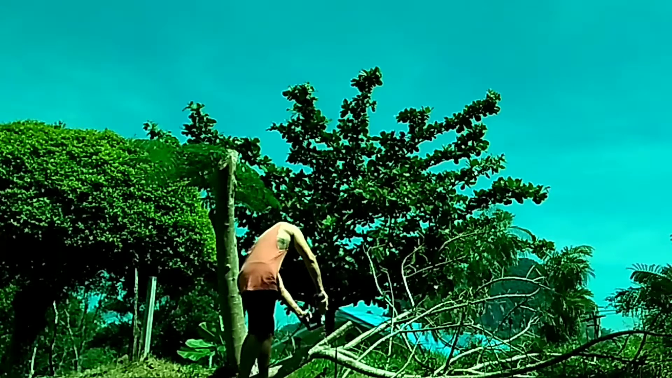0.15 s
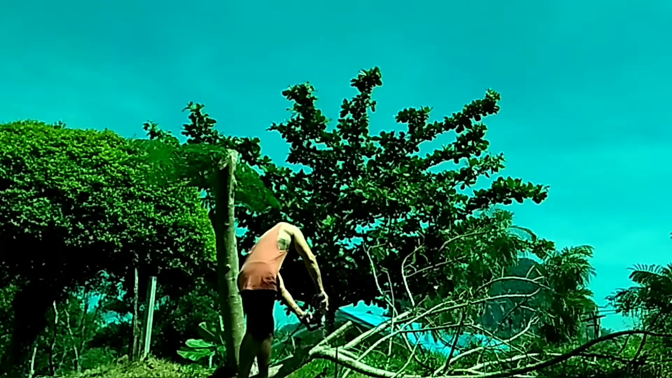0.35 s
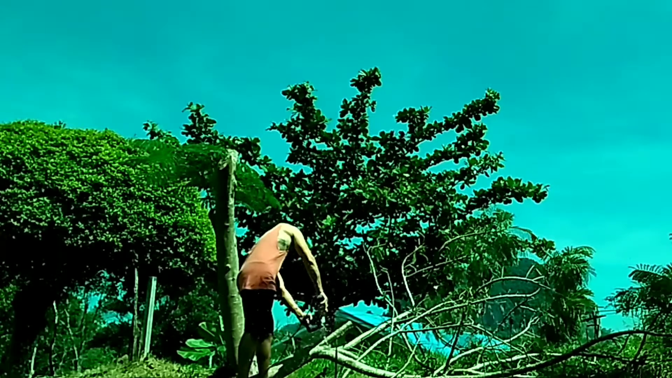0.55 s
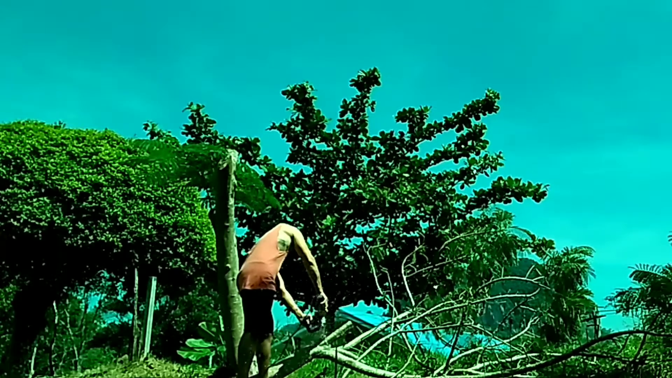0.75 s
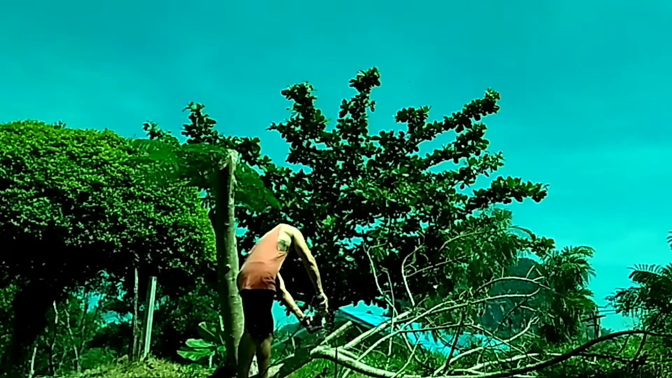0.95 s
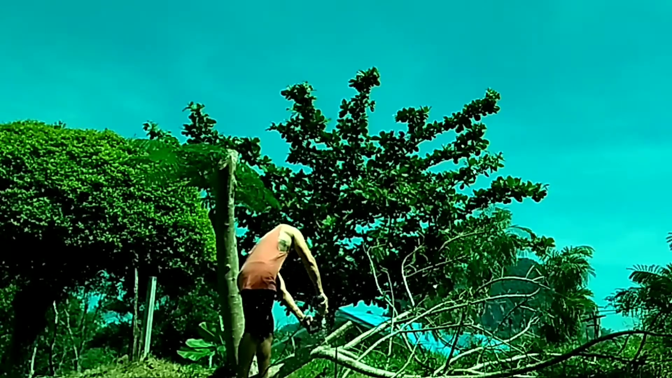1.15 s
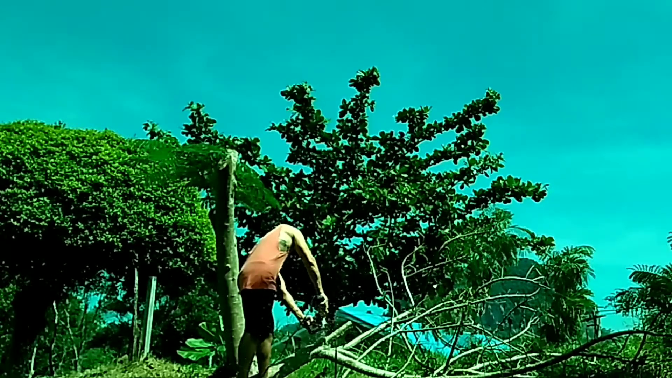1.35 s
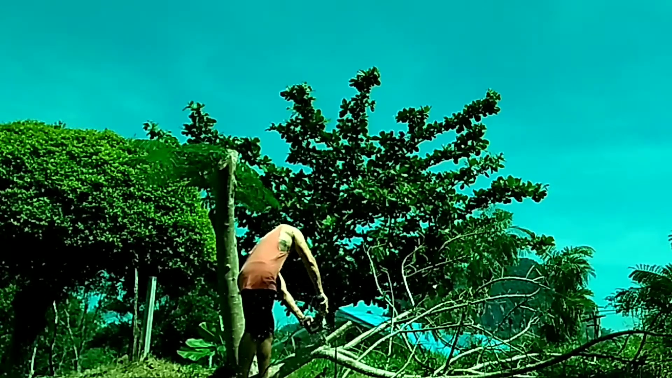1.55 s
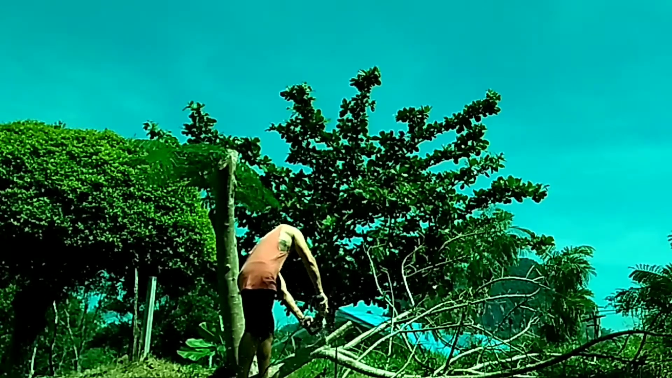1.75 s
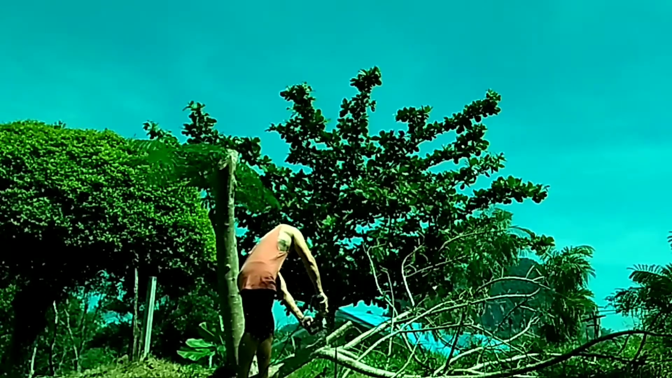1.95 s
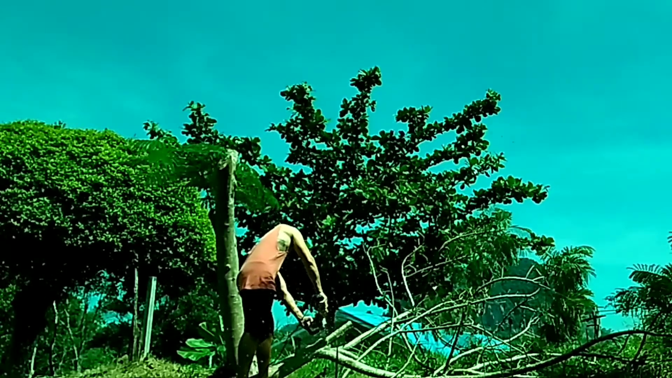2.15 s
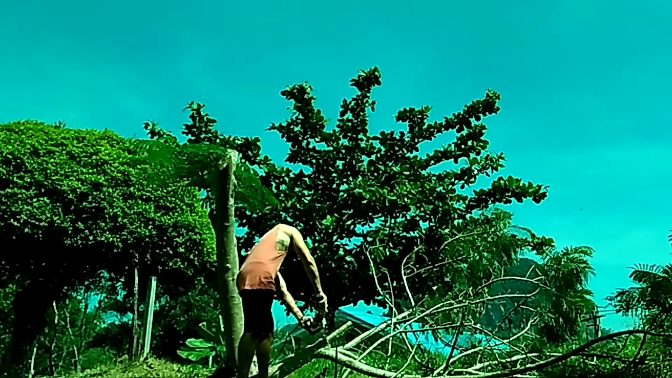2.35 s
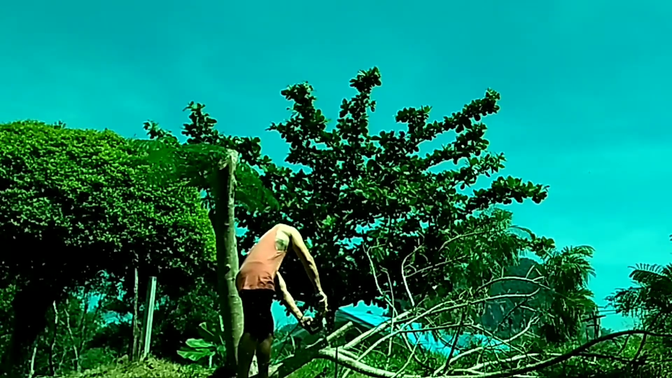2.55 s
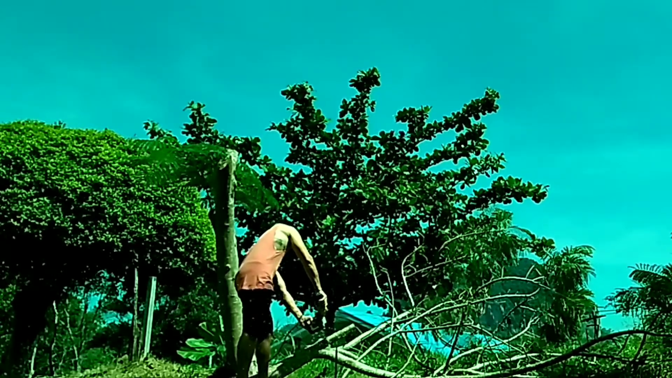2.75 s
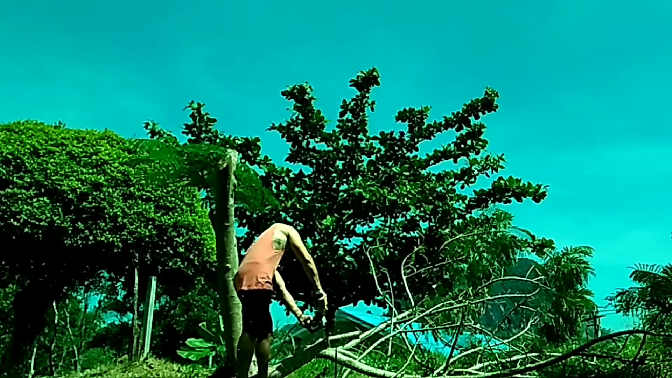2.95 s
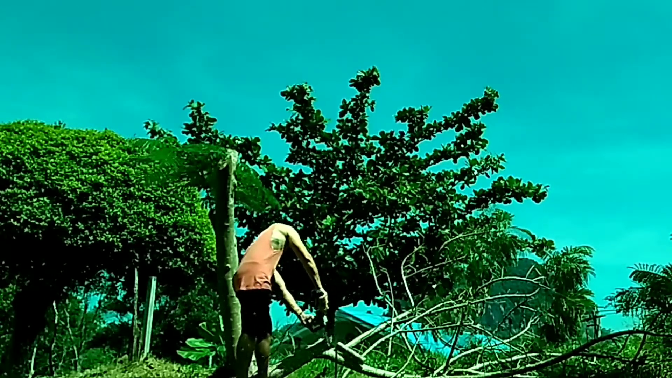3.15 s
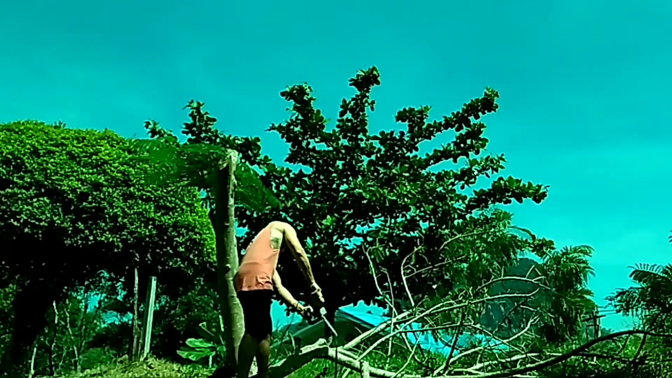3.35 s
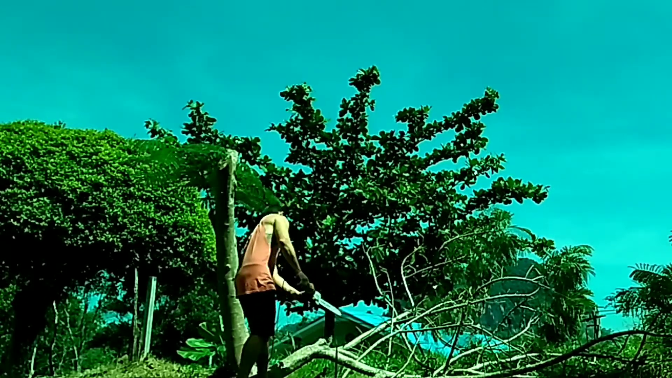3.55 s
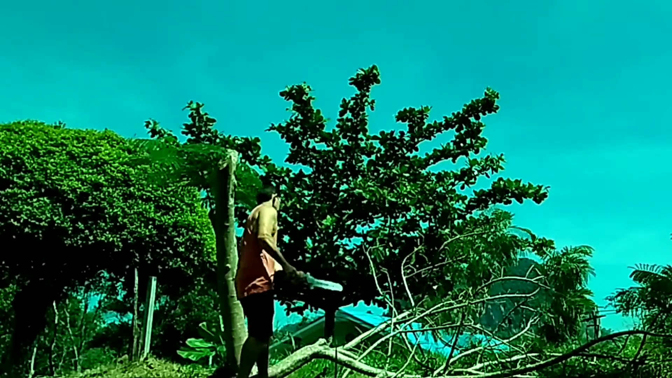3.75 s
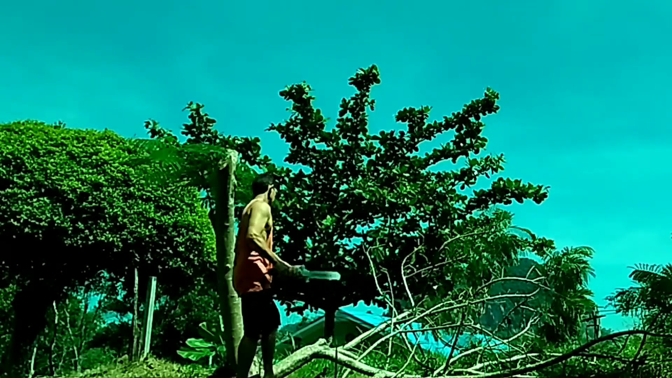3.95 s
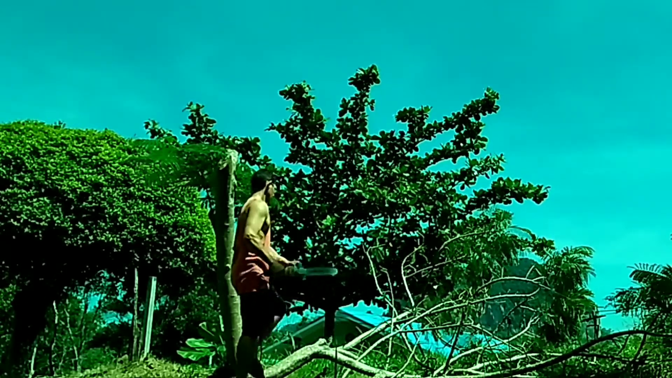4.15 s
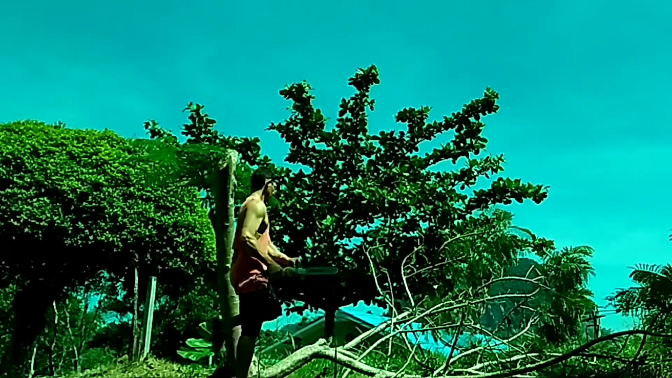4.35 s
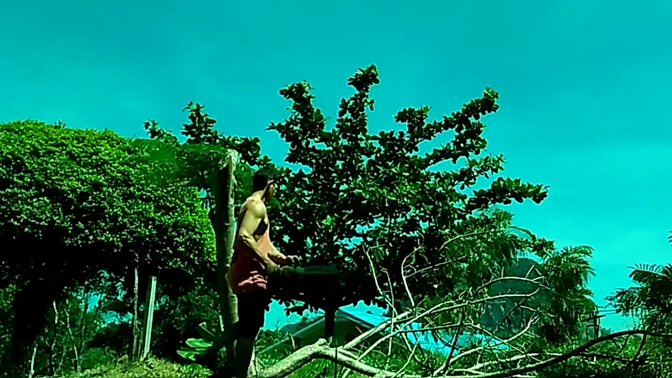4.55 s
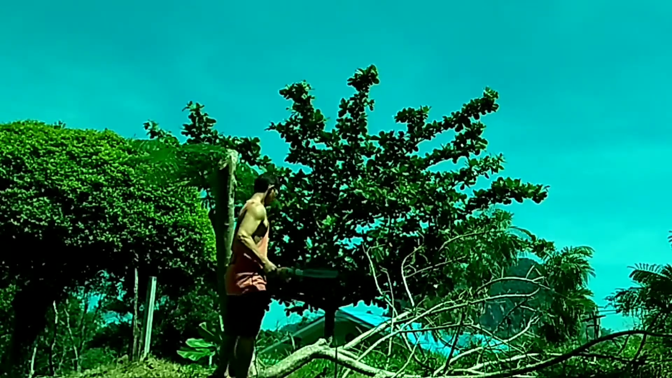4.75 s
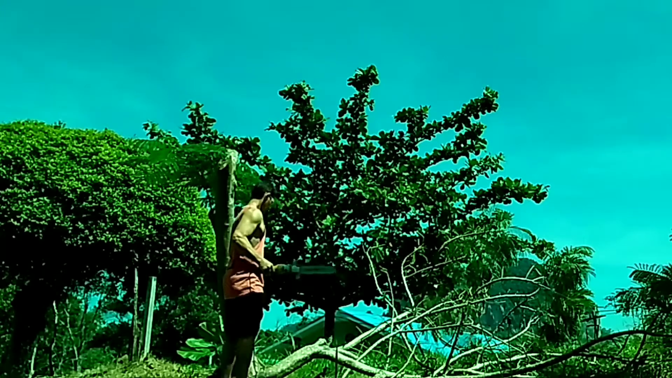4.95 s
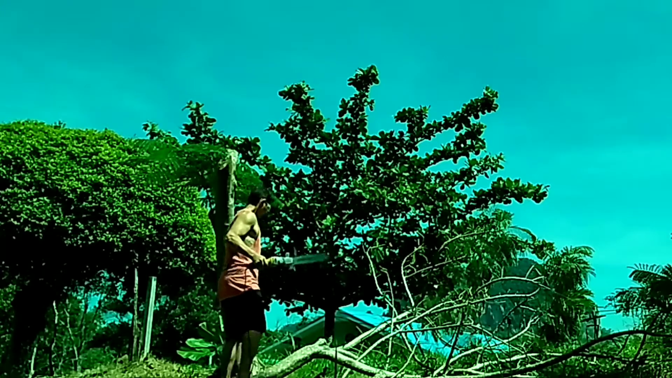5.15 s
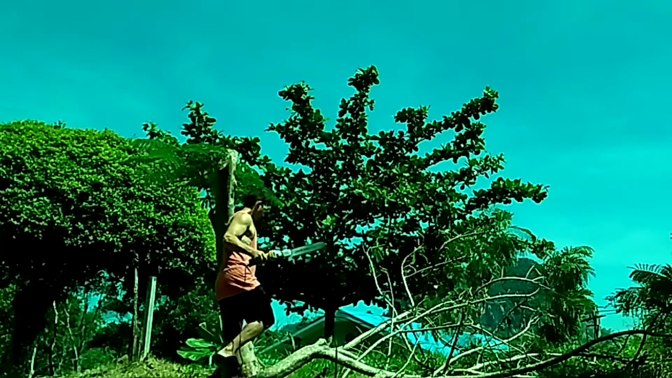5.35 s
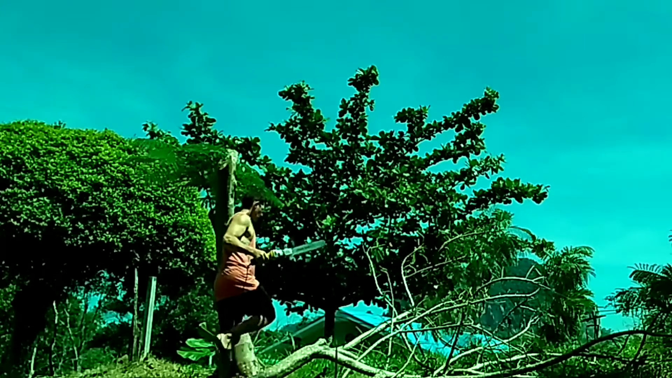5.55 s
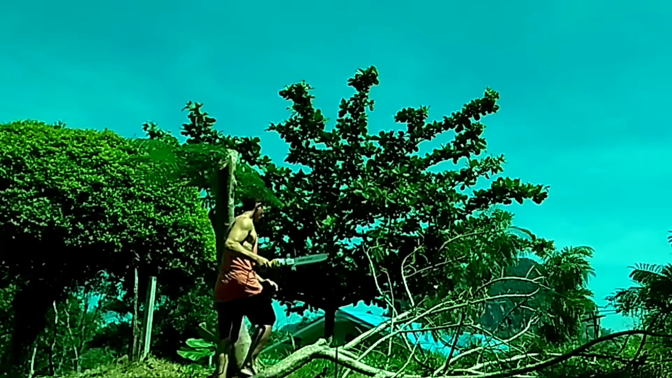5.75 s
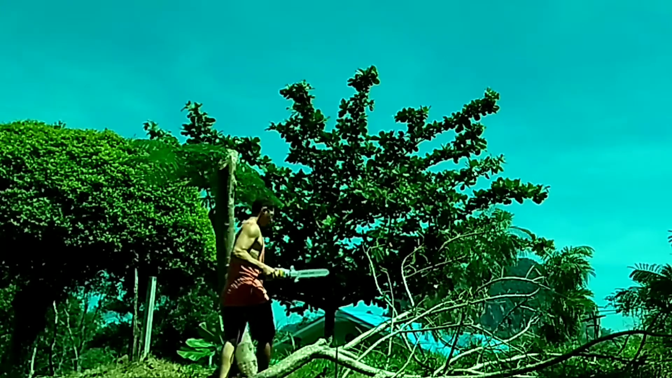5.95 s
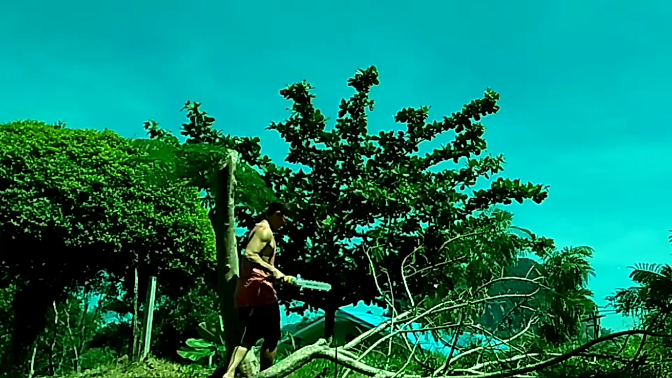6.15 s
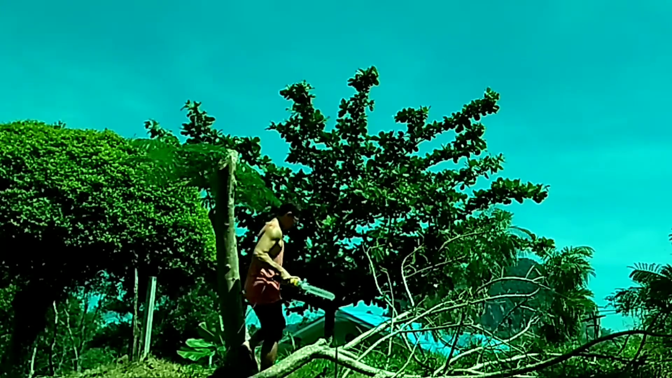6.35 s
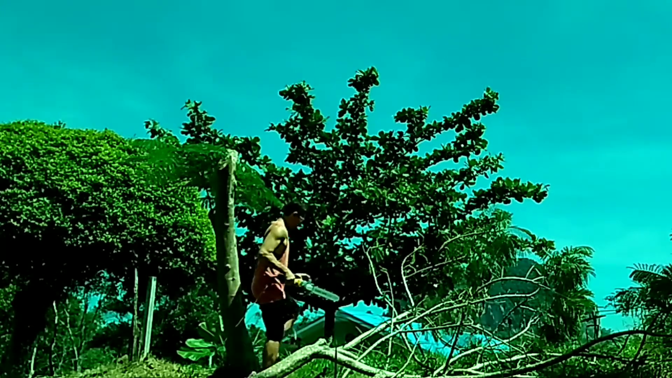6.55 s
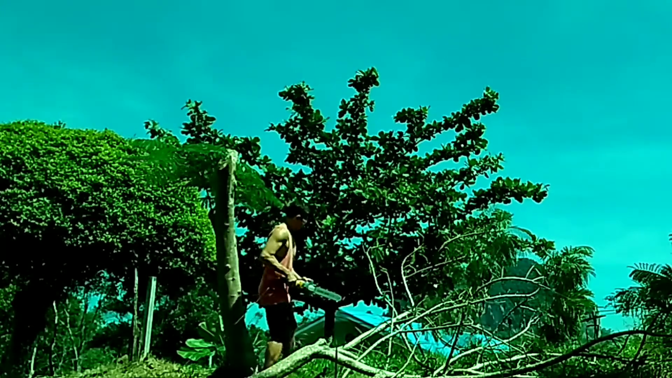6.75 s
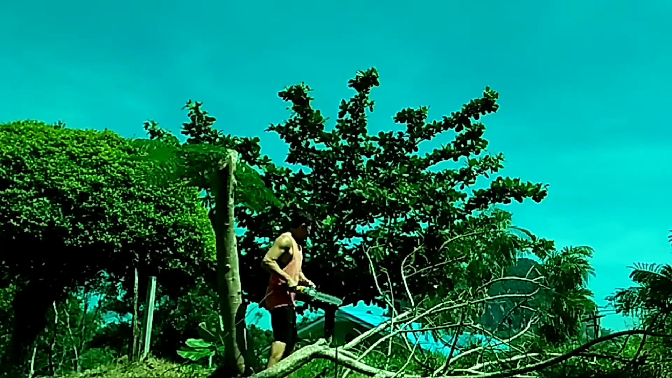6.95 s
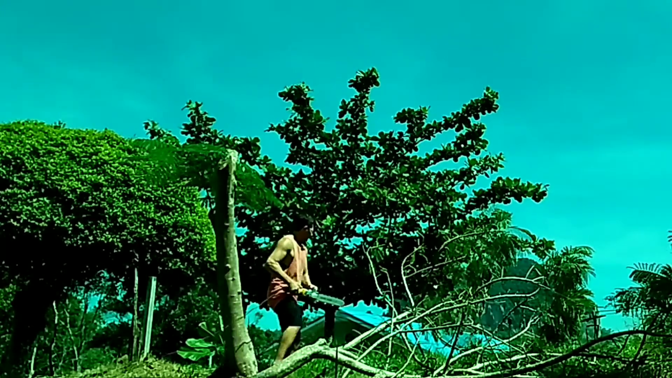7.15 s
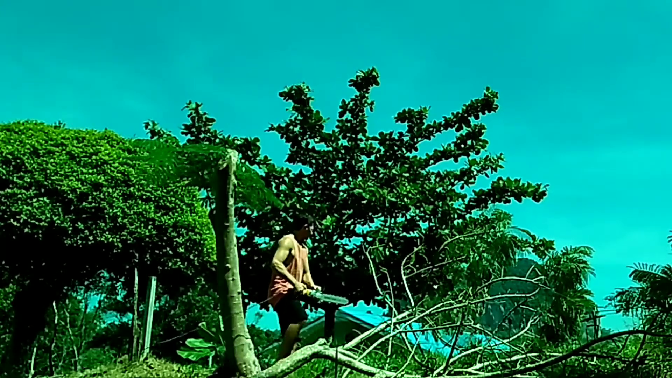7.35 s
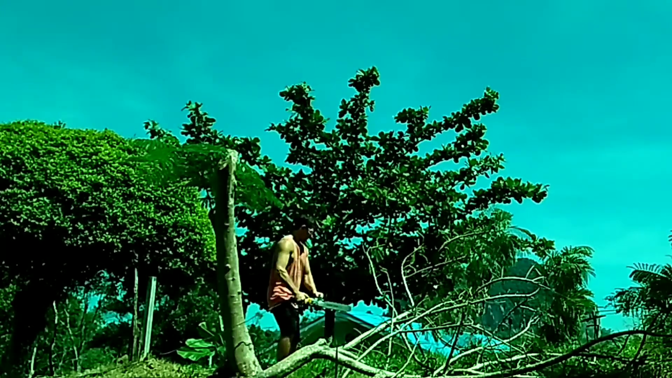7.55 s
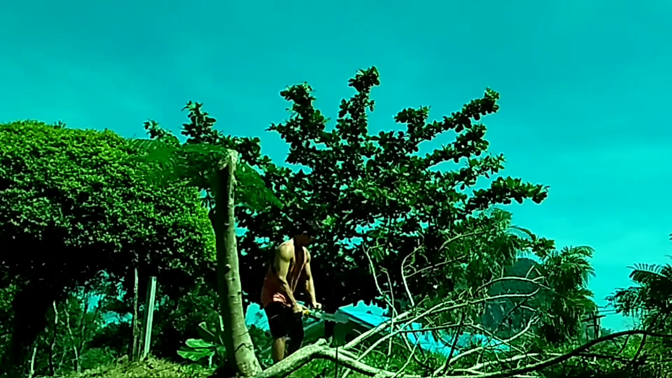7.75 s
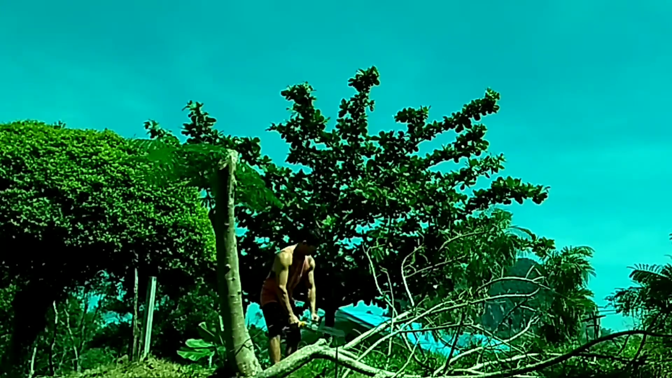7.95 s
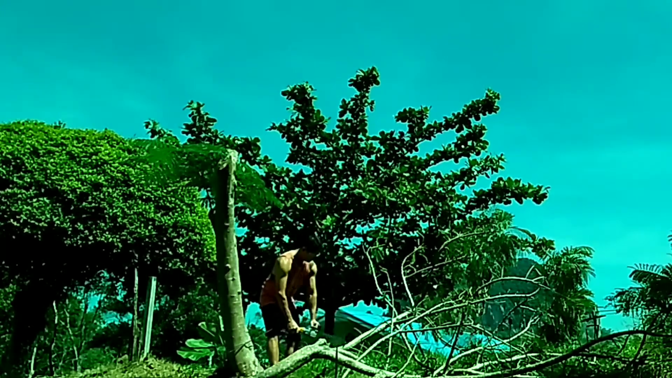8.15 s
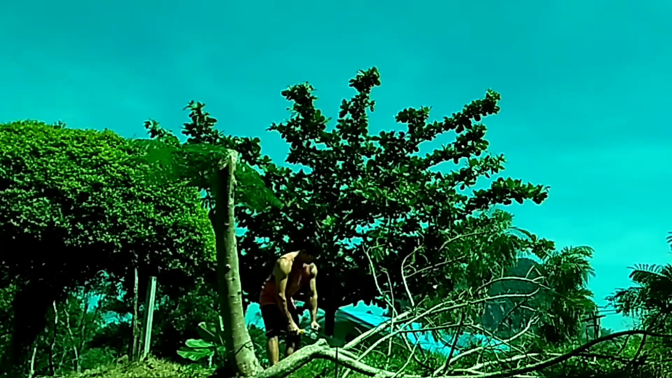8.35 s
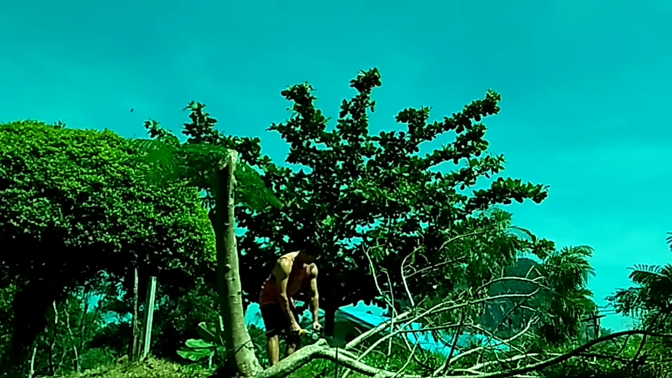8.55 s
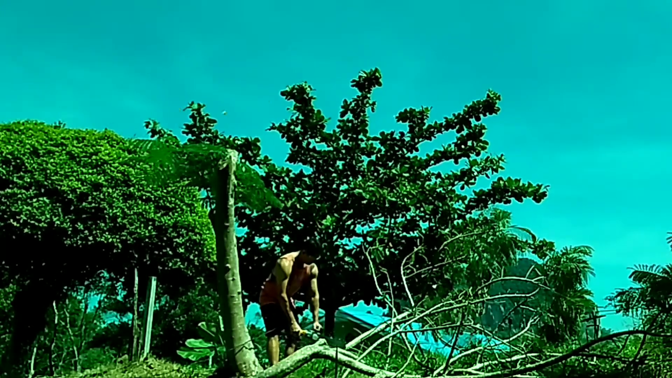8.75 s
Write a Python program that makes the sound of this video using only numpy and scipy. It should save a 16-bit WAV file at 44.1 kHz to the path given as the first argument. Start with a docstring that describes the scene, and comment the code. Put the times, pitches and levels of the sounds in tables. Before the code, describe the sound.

Heard from several metres away outdoors, an electric saw rasps through wood, its pitch dipping and climbing back. It is switched off and winds down, the slack chain slapping and faintly squealing. A few quiet steps crunch leaves and crack twigs against a low, far-off traffic rumble. Then the motor abruptly whines up to speed again and begins the next cut.

```python
"""A garden, the microphone some metres from an angle grinder fitted with a chainsaw bar.
Over a low rumble of air and distant traffic, the teeth tear into a branch: the motor sags, the bar
chatters, and the motor races as it comes free. Switched off near 4 s, it coasts to rest, the slack
chain slapping the bar and faintly squealing. From 6 s twigs snap and leaves rustle underfoot;
then the motor starts again and the chain meets the next branch. A low wall echoes the saw."""
import sys
import numpy as np
from scipy import signal
from scipy.fft import rfft, irfft, next_fast_len
from scipy.io import wavfile
from scipy.ndimage import uniform_filter1d, map_coordinates

SR = 44100
rng = np.random.default_rng(int(sys.argv[2]) if len(sys.argv) > 2 else 0)


def materialize(psi):
    """Save the field psi as 16-bit PCM at rate SR to the path in sys.argv[1].

    A 1-D psi becomes a single channel; in a 2-D psi each row is a channel.
    """
    bounded = np.clip(np.atleast_2d(psi).T, -1, 1)
    quanta = np.round(bounded * 32767).astype(np.int16)
    wavfile.write(sys.argv[1], SR, quanta)


N = 388521
T = np.arange(N) / SR
HZ = np.fft.rfftfreq(N, 1 / SR)

# Still air and distant traffic: freq_hz, gain_db
AIR_SPECTRUM = [(20, -18), (35, -8.5), (55, -3.5), (85, 3), (140, 0), (180, 1.5), (280, -11), (660, -12),
                (1300, -15), (2000, -28), (3600, -55.5), (16000, -51)]
# Crushed leaves: freq_hz, gain_db
LEAF_SPECTRUM = [(240, -49), (400, -8), (814, -9.5), (1330, -21), (1460, -10), (4510, -25.5), (8110, -15.5),
                 (16000, -16)]
# Feet in the leaves: middle_s, length_s, level_db
FOOTSTEPS = [(6.627, 0.25, -71), (6.92, 0.15, -61.5), (7.066, 0.17, -50.5), (7.32, .08, -70),
             (7.584, 0.2, -53)]
# Wood knocks, twig snaps and loose clinks: start_s, level_db, centre_hz, width_octaves, t60_s
TWIG_TICKS = [(3.127, -27, 450, .9, 0.05), (6.066, -29, 9500, .5, 0.016), (6.203, -43, 9600, .5, .02),
              (6.404, -45, 12100, 0.1, .08), (6.554, -59, 2420, 0.9, 0.041),
              (6.559, -33, 1610, 0.57, 0.013), (6.581, -44, 2400, .8, .012), (6.622, -58, 3000, 1, .015),
              (6.89, -56, 3000, 0.9, .015), (7.021, -48, 5000, 1, .015), (7.06, -38, 700, 0.94, 0.018),
              (7.085, -47, 6000, 1.2, .012), (7.272, -35, 7500, 1.8, 0.011), (7.293, -34, 7100, 0.38, 0.01),
              (7.409, -48, 7350, 0.072, 0.2), (7.515, -51, 2790, 0.55, 0.045),
              (7.558, -52, 8000, 1.3, .012)]
# Lag of the wall's echo at the microphone as the saw is carried about: time_s, delay_s
WALL_ECHO_DELAY = [(3.4, .02007), (4.3, .01987)]
# Rotor speed as the cut loads the motor and lets it go: time_s, speed_hz
SPEED_IN_CUT = [(0.0, 499), (0.17, 492), (0.45, 417), (0.8, 371), (1.15, 354), (1.55, 356), (2.1, 385),
                (2.7, 421), (3.0, 441), (3.35, 479), (3.6, 493), (3.87, 499)]
# Blend from free-running (0) to cutting (1) sound, as the chain bites and the saw is turned:
# time_s, blend_fraction
CUTTING_COLOUR = [(0, 0.91), (.8, 1), (3.0, 0.92), (3.4, 0.67), (3.8, 0.62), (4.3, 0.27), (8.1, 0.12),
                  (8.81, 0.34)]
# Roar of gears and fan: rotor_multiple, gain_db
ROAR_SPECTRUM = [(.5, -23), (1, -12), (2, -4), (3.3, -1.5), (5, 2.5), (6.5, -0.5), (7.6, -1), (9, -2),
                 (10.2, -2.5), (11, -5.5), (13.5, -7), (16, -10.5), (30, -63)]
# Sprocket and commutator tones: rotor_multiple, free_gain_db, cutting_gain_db
DRIVE_TONES = [(1.68, -32, -24.8), (2, -25, -36), (3.36, -28, -29), (5.04, -21, -23), (12, -34, -21.5)]
# Resonances of the housing: centre_hz, width_hz, gain_db
HOUSING_MODES = [(662, 20, 4.5), (1340, 160, 9.5), (4380, 240, 7.5), (5960, 200, 9)]
# Resonances of the air vents, swept by the fan's blade rate: centre_hz, width_hz, gain_db
VENT_MODES = [(1634, 300, 6.5), (2630, 630, 12), (3630, 600, 4.5), (4500, 300, -8)]
# Flares of single drive tones: middle_s, length_s, rotor_multiple, level_db, roughness_rad
BIND_FLARES = [(.57, .29, 9, -38.5, 1), (0.72, 0.2, 1.68, -43, .3), (0.74, 0.38, 3.36, -42, 1),
               (2.07, 0.077, 3.36, -34, 0.6), (2.27, 0.07, 3.36, -37, 1), (2.355, .05, 3.36, -36, .6),
               (2.545, 0.09, 3.36, -32, 0.5), (2.79, .08, 3.36, -37, .7), (4.17, .2, 9, -40, 1.8)]
# Chain running free: freq_hz, gain_db
FREE_CHAIN_SPECTRUM = [(100, -65), (350, -12), (700, -5), (900, -1.5), (1150, -10), (1480, 0.5), (2000, 0),
                       (2600, 1.5), (3500, -1), (4700, -7), (6200, -2), (8300, 2.5), (9600, -2.5),
                       (11200, -7), (15500, -5)]
# Chain cutting wood: freq_hz, gain_db
CUTTING_CHAIN_SPECTRUM = [(50, -23), (120, -7), (280, -19.5), (700, -20), (1000, -1.5), (1500, -12),
                          (2300, 3.5), (3300, -8), (4800, -5), (6500, 1), (9000, 1), (12000, -3),
                          (15500, -1.5)]
# Ring of the bar under a taut, free chain: centre_hz, width_hz, gain_db
TAUT_MODES = [(797, 200, -1), (1670, 410, -2), (2400, 200, -2.5), (8450, 230, 4), (9500, 400, 4)]
# Ring of the bar knocked by a slack chain: centre_hz, width_hz, gain_db
SLACK_MODES = [(1010, 150, 3), (1440, 260, 5), (1920, 185, 5.5), (6120, 410, 4.5), (7500, 700, 2)]
# Treble resonances of the cutters in the wood: centre_hz, width_hz, gain_db
CUTTER_MODES = [(7800, 200, 5.5), (9570, 210, 5), (11090, 910, 9), (13000, 400, 5), (14150, 300, 4.5),
                (14900, 600, 7.5)]
# Ring of the bar as fibres tear: centre_hz, width_hz, gain_db
RASP_MODES = [(1295, 100, 24), (1950, 160, 17), (2170, 150, 13), (2400, 115, 24)]
# That ring rises as the bar sinks through the branch: time_s, pitch_ratio
RASP_GLIDE = [(0.2, 0.96), (1.7, .993), (2.3, 0.96), (2.85, 1.035), (3.4, 1.02)]
# Brief changes in the chain's force: middle_s, length_s, rattle_gain_db, rasp_gain_db
CHAIN_SURGES = [(.03, 0.26, -0.7, -1.5), (2.608, 0.22, 2.5, -6), (2.969, 0.45, 0.5, 5), (3.73, 0.3, 1, 5),
                (4.35, 1, 2, 1.5)]
# The bar hops in the cut and shakes the branch: middle_s, length_s, level_db
BAR_HOPS = [(.12, 0.38, -55), (.79, 0.37, -53), (1.19, 0.41, -50.5), (1.74, 0.36, -46), (2.35, 0.5, -50.5),
            (3.043, 0.42, -46), (3.568, .27, -45.5), (3.92, .15, -54.5)]

OFF_S, ON_S, NEXT_BRANCH_S = 3.87, 7.63, 8.33
WORKING_HZ, CREEP_HZ = 420, 24  # rotor speeds
FAN_BLADES, LINKS_PER_TURN = 9, 1.68


def gain_of(db):
    """Decibels to amplitude."""
    return np.exp(np.asarray(db) * (np.log(10) / 20))


def unit_rms(x):
    """Scales to rms 1."""
    return x / np.sqrt(np.mean(x ** 2) + 1e-20)


def curve(rows):
    """A time table's value at every sample."""
    return np.interp(T, *np.transpose(rows))


def spectrum_db(points, hz=HZ):
    """Gain in dB, interpolated on a log-frequency axis."""
    freqs, db = np.transpose(points)
    return np.interp(np.log(hz + 1e-6), np.log(freqs), db)


def peaks_db(modes, hz=HZ):
    """Gain in dB of a set of resonances."""
    return sum(db / (1 + (2 * (hz - centre) / width) ** 2) for centre, width, db in modes)


def band_db(centre_hz, octaves):
    """Gain in dB of one band."""
    return -20 * np.log10(1 + (np.log2((HZ + 1) / centre_hz) / octaves) ** 2)


def coloured(x, db):
    """Filters x by a gain in dB given along HZ; rms 1."""
    size = next_fast_len(len(x) + 4096)
    gain = gain_of(np.interp(np.fft.rfftfreq(size, 1 / SR), HZ, db))
    return unit_rms(irfft(rfft(x, size) * gain, size)[:len(x)])


def drift(rate_hz):
    """A random wander of rms 1 that takes a new direction at the given rate."""
    knots = rng.standard_normal(8192)
    return unit_rms(np.interp(T * rate_hz, np.arange(8192), knots))


def swell(middle_s, length_s, order=2):
    """A bell of height 1 in time; a higher order flattens its top."""
    return np.exp(-np.minimum(abs(2 * (T - middle_s) / length_s) ** order, 50))


def varispeed(x, ratio):
    """Plays x at a changing speed, so that its resonances move."""
    return map_coordinates(x, [np.cumsum(ratio) - ratio[0]], order=3, mode="mirror")


def air(level_db=-52.5):
    """Still air and far-off traffic: a low rumble, gently swelling."""
    return gain_of(level_db + drift(3.8)) * coloured(rng.standard_normal(N), spectrum_db(AIR_SPECTRUM))


def underfoot(tail_db=-20, tail_t60=0.35, rise_share=0.14):
    """Leaves crunch underfoot, with a few sharp ticks that scatter among the trees."""
    crunch = rng.standard_normal(N) * gain_of(2.5 * drift(700) + drift(90))
    tread = sum(gain_of(db) * swell(s, length) for s, length, db in FOOTSTEPS)
    out = tread * coloured(crunch, spectrum_db(LEAF_SPECTRUM))
    t = T[:SR // 3]
    for start_s, db, hz, octaves, t60 in TWIG_TICKS:
        burst = coloured(rng.standard_normal(len(t)), band_db(hz, octaves))
        attack = np.minimum(t / (rise_share * t60), 1)
        decay = gain_of(-60 * t / t60) + gain_of(tail_db - 60 * t / tail_t60)
        at = round(start_s * SR)
        out[at:at + len(t)] += gain_of(db) * burst * attack * decay
    return out


def garden_echoes(direct, scatter_db=-20, sway_s=0.00013, wall_db=-14, wall_cut_hz=750):
    """Adds shifting reflections off ground and trunks, and off a low wall that returns no bass."""
    delays_s = (.0025, .0043, .0063, .0112, .0155)
    scatter = sum(np.interp(T - s - sway_s * drift(1.5), T, direct, left=0) for s in delays_s)
    treble = signal.sosfiltfilt(signal.butter(2, wall_cut_hz, "high", fs=SR, output="sos"), direct)
    wall = np.interp(T - curve(WALL_ECHO_DELAY), T, treble, left=0)
    return direct + gain_of(scatter_db) * scatter + gain_of(wall_db) * wall


def rotor_speed(drag_s=2.2, friction_hz_per_s=101, top_hz=555, half_speed_s=.109, sag_hz_per_s=147):
    """Turns per second: loaded by the cut, stopped by drag and friction, restarted, loaded again."""
    friction_hz = friction_hz_per_s * drag_s
    drag = np.exp(-np.maximum(T - OFF_S, 0) / drag_s)
    first_run = (curve(SPEED_IN_CUT) + friction_hz) * drag - friction_hz
    on_s = np.maximum(T - ON_S, 0)
    restart = top_hz * on_s / (on_s + half_speed_s) - sag_hz_per_s * np.maximum(T - NEXT_BRANCH_S, 0)
    return np.maximum(first_run, 0) + restart


def coasting_s():
    """Time since the power was cut; zero while the motor is on."""
    return np.maximum(T - OFF_S, 0) * (T < ON_S)


def drive_tone(cycles):
    """A sine of rms 1 that flares and flutters with the slack in the drive."""
    flare = gain_of(1.4 * drift(14) + 2.3 * drift(70))
    return unit_rms(flare * np.sin(2 * np.pi * cycles + .6 * drift(60)))


def rotor_hum(turns, speed, cutting, level_db=-36, cutting_db=-13, corner_hz=386):
    """One cycle a turn, fading steeply below the corner speed and quieter in the cutting sound."""
    rise = (speed / corner_hz) ** 11
    loudness = gain_of(level_db + cutting_db * cutting ** 3) * rise / (1 + rise)
    return np.sqrt(2) * loudness * (1 + .23 * drift(18)) * np.sin(2 * np.pi * turns)


def drive_roar(turns, speed, gain_db=-3):
    """Turbulence of gears and fan, made turn by turn so its whole spectrum slides with the speed."""
    size, per_turn = 2 ** 19, 2 ** 7
    multiples = np.fft.rfftfreq(size, 1 / per_turn)
    noise = irfft(rfft(rng.standard_normal(size)) * gain_of(spectrum_db(ROAR_SPECTRUM, multiples)))
    roar = unit_rms(np.interp(turns * per_turn, np.arange(size), noise))
    return gain_of(gain_db) * (speed / WORKING_HZ) ** 1.33 * roar


def drive_whine(turns, speed, cutting, play_turns=.012):
    """Sprocket and commutator tones glide through the housing's resonances, smeared by gear play."""
    shaky = turns + play_turns * drift(200)
    whine = np.zeros(N)
    for multiple, free_db, cutting_db in DRIVE_TONES:
        db = free_db + cutting * (cutting_db - free_db) + peaks_db(HOUSING_MODES, multiple * speed)
        whine += gain_of(db) * drive_tone(multiple * shaky)
    return whine


def fan_whirr(turns, speed, cutting, gain_db=-12):
    """In the free-running sound, the fan churns air into a fuzzy band about its blade rate."""
    churn = np.sqrt(2) * drift(420) * np.sin(2 * np.pi * FAN_BLADES * turns + 1.1 * drift(600))
    return gain_of(gain_db + peaks_db(VENT_MODES, FAN_BLADES * speed)) * (1 - cutting) * churn


def fan_whistle(turns, speed, cutting, level_db=-41):
    """The fan's staggering blade tone comes up with the cutting sound."""
    stagger = .55 * drift(240) / (2 * np.pi)
    loudness = gain_of(level_db + peaks_db(VENT_MODES, FAN_BLADES * speed)) * speed / WORKING_HZ
    return cutting * loudness * drive_tone(FAN_BLADES * turns + stagger)


def binds(turns):
    """Short growls and squeaks that glide with the speed, mostly as the bar binds in the kerf."""
    wobble = drift(150) / (2 * np.pi)
    return sum(gain_of(db) * swell(s, length, order=4) * drive_tone(multiple * turns + rough * wobble)
               for s, length, multiple, db, rough in BIND_FLARES)


def link_rattle(turns, speed, spread_db=2.5, ring_s=0.0008, scrape=1.0):
    """Each link slaps the bar with its own force, over the steady scrape of the groove."""
    links = np.diff(np.floor(turns * LINKS_PER_TURN), prepend=0) > 0
    force = links * gain_of(spread_db * np.clip(rng.standard_normal(N), -3, 3))
    power = signal.lfilter([1], [1, -np.exp(-1 / (ring_s * SR))], uniform_filter1d(force ** 2, size=24))
    power = abs(power) / (abs(uniform_filter1d(power, size=6000)) + 1e-3)  # local mean near 1
    slap = np.clip(speed / 170, 0, 1)  # a slow chain only slides
    return np.sqrt(slap * power + (1 - slap) + scrape) * rng.standard_normal(N)


def groove_squeal(speed, level_db=-52, slide_hz=70):
    """Slowly sliding links squeal thinly in the bar's groove."""
    sliding = np.exp(-np.minimum(speed / slide_hz, 5) ** 2)
    loudness = sliding * gain_of(level_db + 4.9 * drift(80))
    return loudness * coloured(rng.standard_normal(N), band_db(13600, 0.11))


def wood_rasp(turns, speed, cutting, extra_db, level_db=-33.5, snaps_per_s=130, snap_s=.003):
    """Teeth snap fibres one by one, in gritty, uneven bursts that ring in the bar."""
    snaps = (rng.random(N) < snaps_per_s / SR) * gain_of(3.5 * np.minimum(rng.exponential(1, N), 3))
    power = signal.lfilter([1], [1, -np.exp(-1 / (snap_s * SR))], snaps ** 2)
    surge = gain_of(1.5 * drift(16))
    tears = link_rattle(turns, speed) * np.sqrt(power + .1) * surge
    ring = coloured(tears, peaks_db(RASP_MODES) + band_db(2000, 0.48))
    loudness = gain_of(level_db + extra_db) * cutting ** 2 * np.minimum(speed / CREEP_HZ, 1)
    return loudness * varispeed(ring, curve(RASP_GLIDE) + .00507 * drift(7))


def chain(turns, speed, cutting, level_db=-24.5, cutting_db=4.5, taut_hz=320, slack_hz=200):
    """The rattle blends three colours: taut and free, cutting, slack when slow; it rasps and squeals."""
    slaps = link_rattle(turns, speed)
    free_db = spectrum_db(FREE_CHAIN_SPECTRUM)
    taut = coloured(slaps, free_db + peaks_db(TAUT_MODES))
    swing = 1 + .025 * drift(4)
    lurch = gain_of(1 + .9 * drift(110))
    loose = lurch * varispeed(coloured(slaps, free_db + peaks_db(SLACK_MODES)), swing)
    slack = np.clip((taut_hz - speed) / (taut_hz - slack_hz), 0, 1)
    free = slack * loose + (1 - slack) * taut
    sawing = coloured(slaps, spectrum_db(CUTTING_CHAIN_SPECTRUM) + peaks_db(CUTTER_MODES))
    rattle_db, rasp_db = sum(np.outer(gains, swell(s, length)) for s, length, *gains in CHAIN_SURGES)
    force = speed / WORKING_HZ * gain_of(level_db + cutting_db * cutting + rattle_db + .7 * coasting_s())
    rattle = force * (cutting * sawing + (1 - cutting) * free)
    moving = np.sqrt(np.minimum(speed / CREEP_HZ, 1))  # a creeping chain hardly sounds
    return moving * (rattle + groove_squeal(speed)) + wood_rasp(turns, speed, cutting, rasp_db)


def saw(drive_db=-27, cutting_db=3, coast_db_per_s=-8.5, chatter_hz=57.5, mains_pulse_hz=100, jolt_db=7):
    """Rotor speed drives every part; the bar hops in the cut and the mains pulses the starting motor."""
    speed = rotor_speed()
    turns = np.cumsum(speed * (1 + .0015 * drift(30))) / SR
    cutting = curve(CUTTING_COLOUR)
    chatter = sum(gain_of(db) * swell(s, length, order=3) for s, length, db in BAR_HOPS)
    hop = np.sin(2 * np.pi * np.cumsum(chatter_hz * (1 + 0.023 * drift(28))) / SR)
    shake = 1 + .09 * np.sqrt(chatter / chatter.max()) * hop
    acceleration = np.gradient(speed) * SR
    jolt = np.maximum(acceleration, 0) / acceleration.max()  # the start snatches the chain tight
    current = np.clip(acceleration / 1000, .15, 1)  # highest while speeding up
    pulsing = 1 + .17 * current * np.sin(2 * np.pi * mains_pulse_hz * T)
    tones = fan_whirr(turns, speed, cutting) + drive_whine(turns, speed, cutting)
    drive_gain = gain_of(drive_db + cutting_db * cutting + coast_db_per_s * coasting_s())
    parts = drive_gain * (drive_roar(turns, speed) + (speed / WORKING_HZ) ** .9 * tones)
    parts += fan_whistle(turns, speed, cutting) + binds(turns)
    parts += gain_of(jolt_db * jolt) * chain(turns, speed, cutting)
    flutter = gain_of(.28 * drift(50))
    branch = np.sqrt(2) * chatter * hop
    return shake * pulsing * flutter * parts + rotor_hum(turns, speed, cutting) + branch


def scene():
    """Saw, footsteps and air at one spot in the garden, alike in both channels."""
    mono = garden_echoes(saw()) + underfoot() + air()
    return np.array([mono, mono])


def record(dry):
    """The microphone feed rolls off sharply at the top of the treble."""
    lowpass = signal.firwin(511, 15850, window=("kaiser", 9), fs=SR)
    return signal.oaconvolve(dry, lowpass[None], "same")


dry = scene()
out = record(dry)
materialize(out)
```